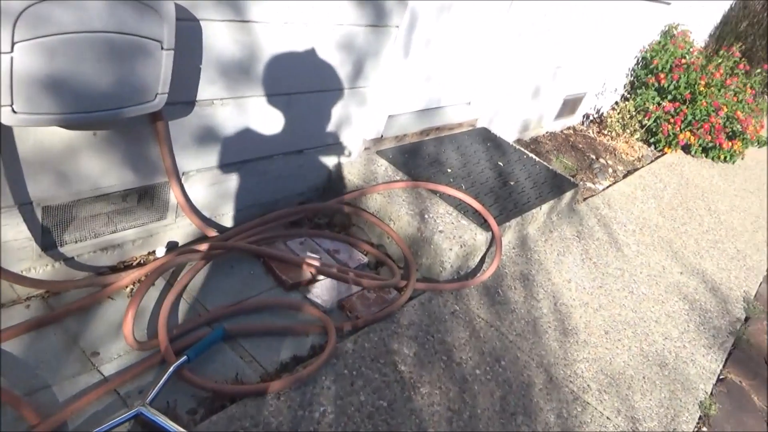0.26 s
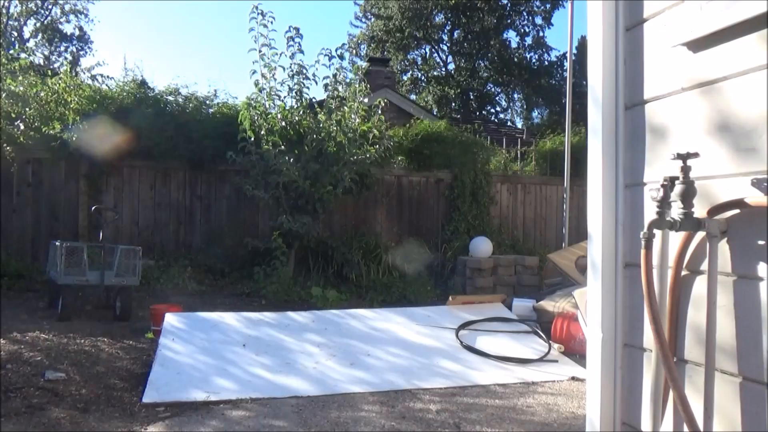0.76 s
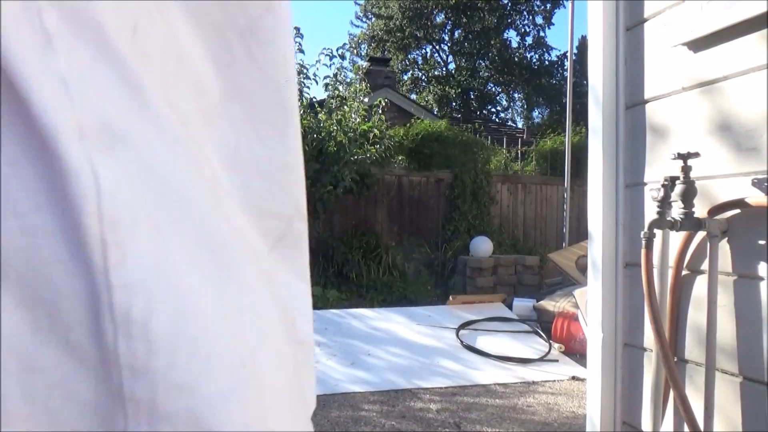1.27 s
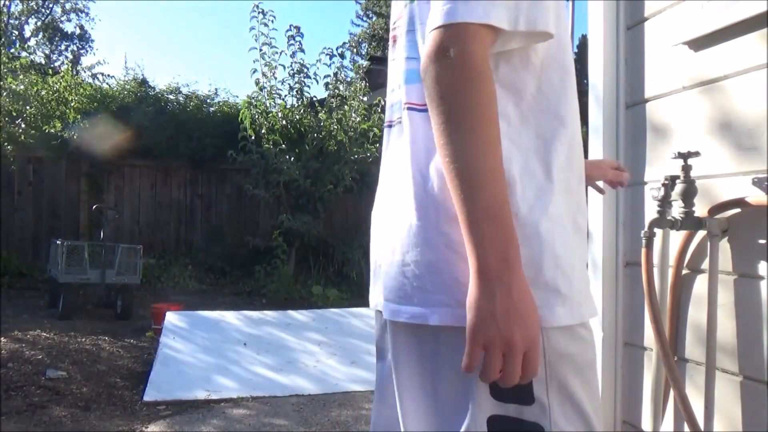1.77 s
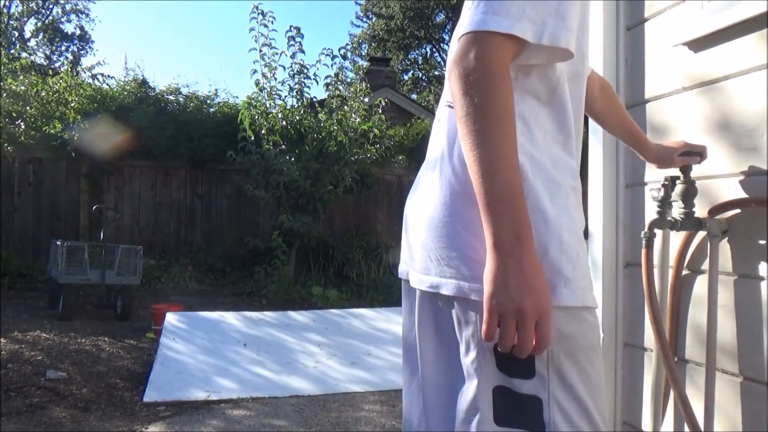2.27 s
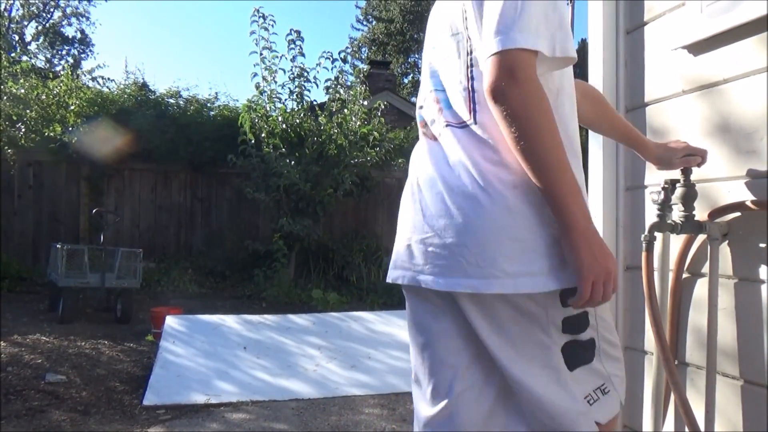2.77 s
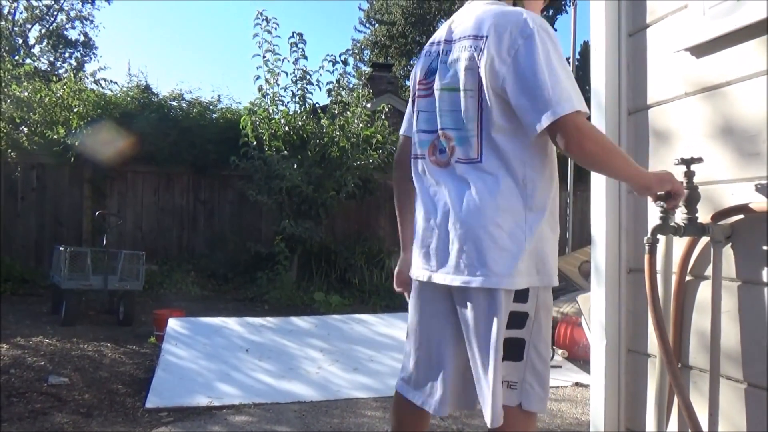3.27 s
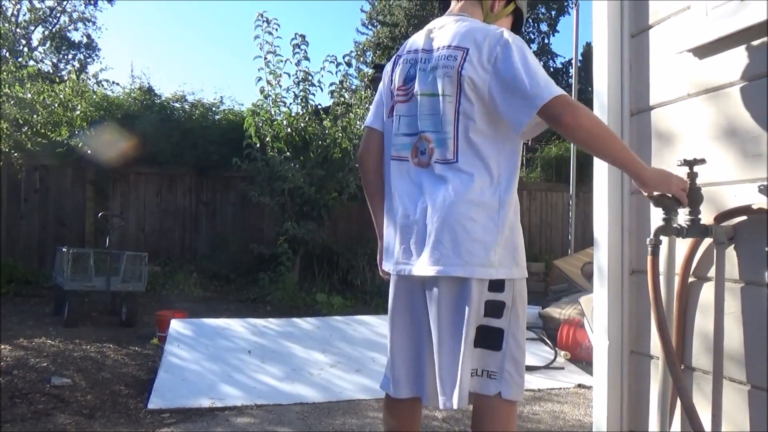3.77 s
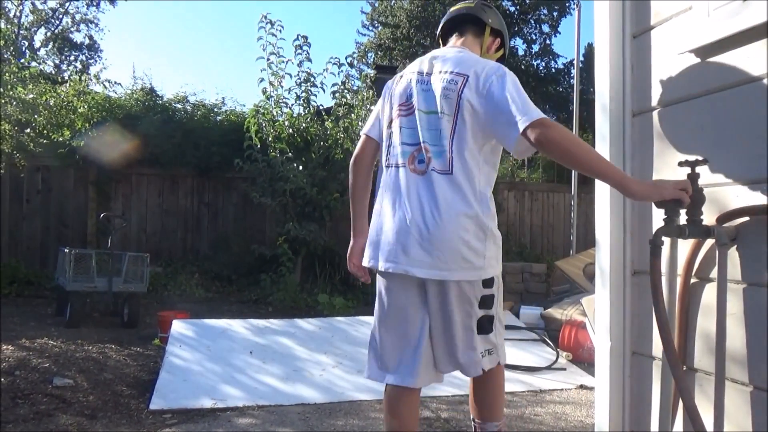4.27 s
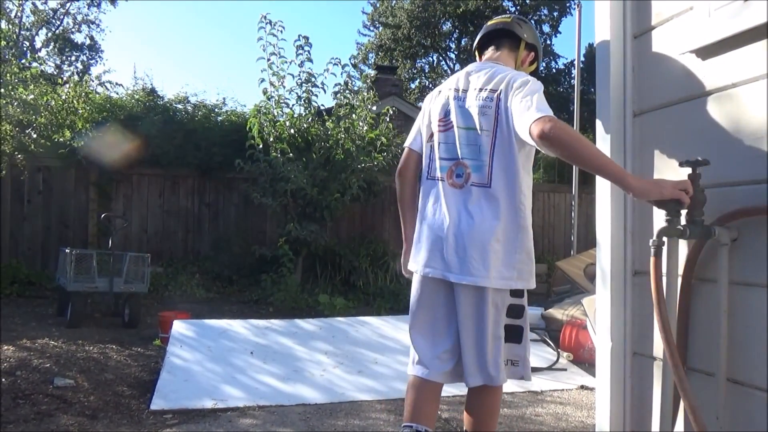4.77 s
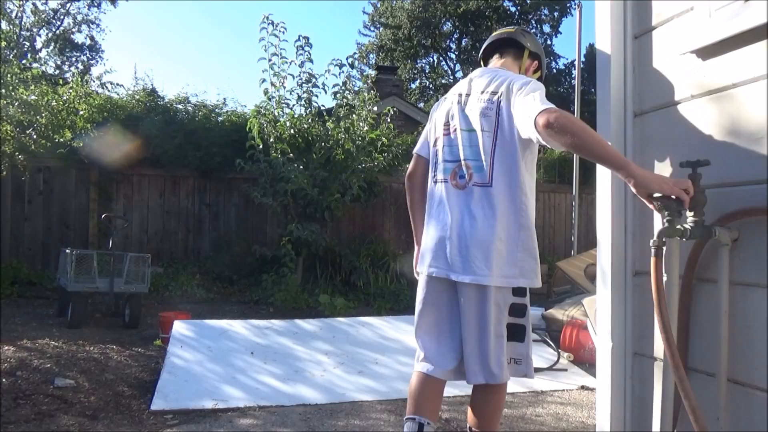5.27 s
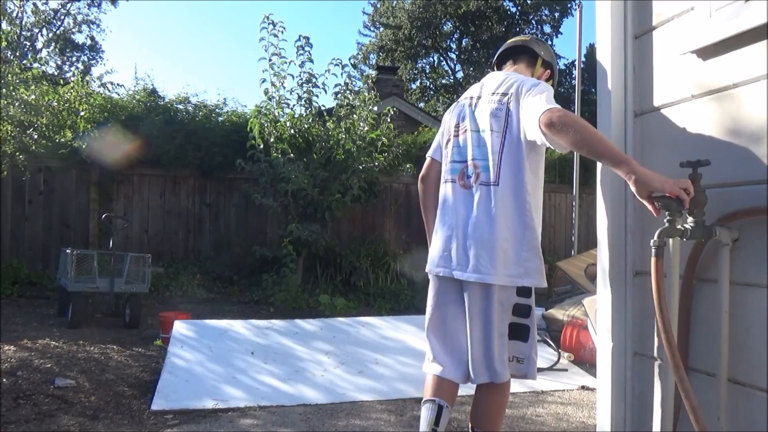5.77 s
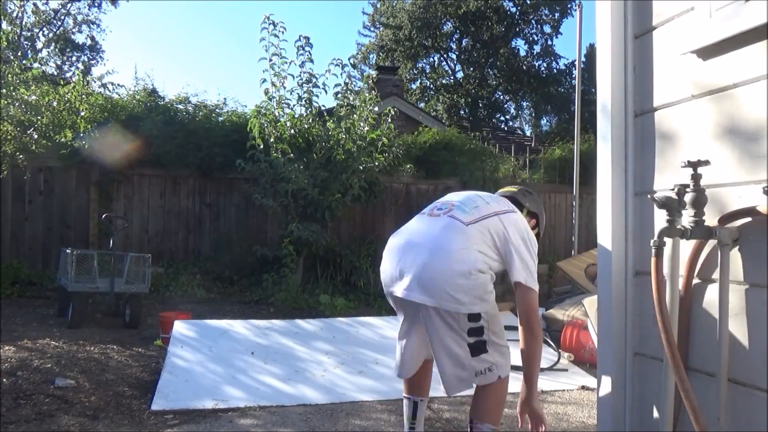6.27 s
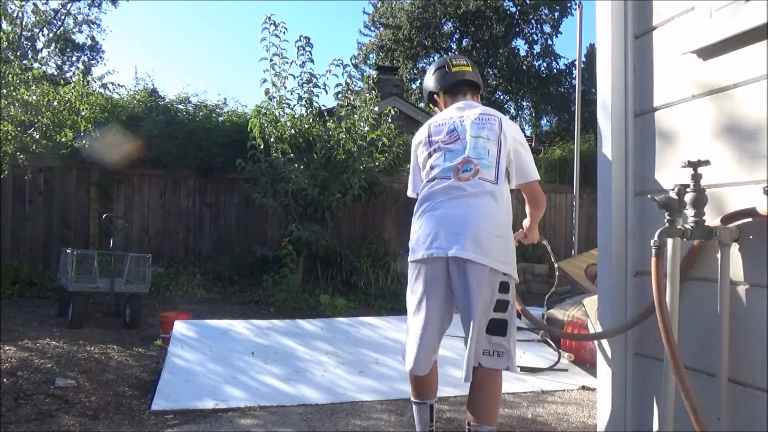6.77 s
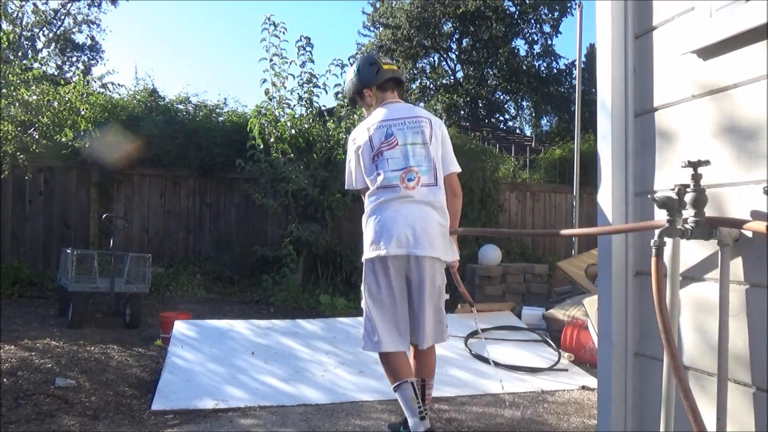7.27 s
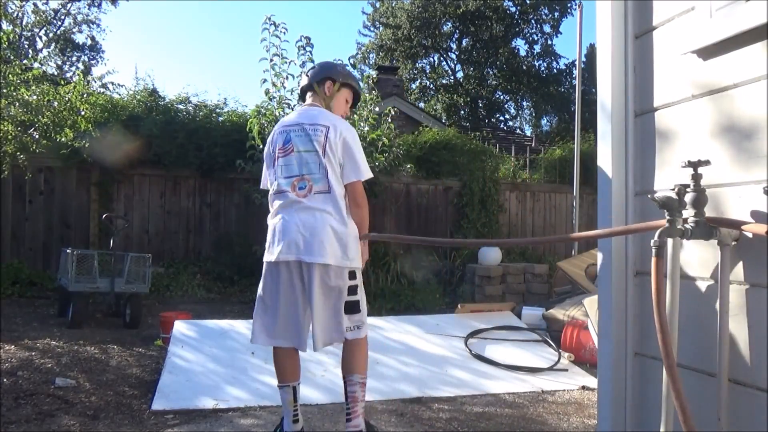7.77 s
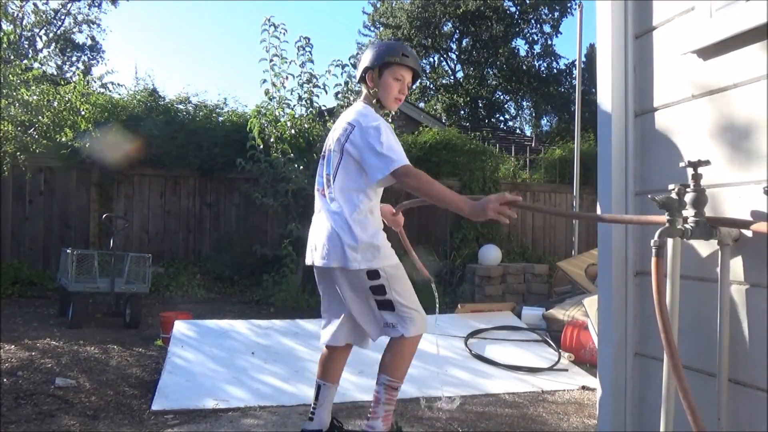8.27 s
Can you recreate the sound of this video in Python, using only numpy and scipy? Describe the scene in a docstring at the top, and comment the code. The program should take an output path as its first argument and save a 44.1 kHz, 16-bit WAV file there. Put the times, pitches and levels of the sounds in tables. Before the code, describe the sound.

Over a low outdoor rumble, someone knocks and turns a tap open; it spits, hisses steadily, and hose water slaps the ground.

```python
"""A back yard: over far traffic and a droning fan, a hand turns a brass garden tap open.
Handle and hose knock, the loose wheel rings and the valve stem squeaks. Turbulence at the valve seat
excites the resonances of tap and pipe, so the water hisses and spits; a house wall reflects the impacts.
All falls silent briefly near the start. Near the end, background and hiss drop in level
and slugs of water slap the paving."""
import sys
import numpy as np
from scipy import signal
from scipy.fft import rfft, irfft, next_fast_len
from scipy.io import wavfile
from scipy.ndimage import uniform_filter1d, map_coordinates

SR = 44100
rng = np.random.default_rng(int(sys.argv[2]) if len(sys.argv) > 2 else 0)


def bounce(signal):
    """Save signal as a 16-bit WAV file at the path given by the first command-line argument."""
    frames = np.transpose(np.atleast_2d(signal))
    limited = np.clip(frames, -1, 1)
    pcm = np.round(limited * 32767).astype(np.int16)
    wavfile.write(sys.argv[1], SR, pcm)


N = 375291
TIME = np.arange(N) / SR
TOP_HZ = 15760  # upper band limit


def amp(db):
    """Amplitude ratio of a level in decibels."""
    return 10 ** (np.asarray(db) / 20)


def unit(x):
    """Normalisation to an rms of 1."""
    return x / np.sqrt(np.mean(x ** 2) + 1e-20)


def along(points, hz):
    """Interpolation of (frequency [Hz], value) points on a logarithmic frequency axis."""
    f, values = np.transpose(points)
    return np.interp(np.log(hz + 1), np.log(f + 1), values)


def curves(rows):
    """Linear interpolation in time: one value per sample for each column after the first."""
    times, *columns = np.transpose(rows)
    return [np.interp(TIME, times, column) for column in columns]


def wobble(rate):
    """Smooth random modulation: a spline through `rate` Gaussian knots a second."""
    knots = rng.standard_normal(int(N * rate / SR) + 4)
    return map_coordinates(knots, [TIME * rate])


def late_drop(db, at_s=6.76, ramp_s=.024):
    """A step in level: a short ramp from 0 to `db`."""
    return db * np.clip((TIME - at_s) / ramp_s + .5, 0, 1)


def filtered(x, response):
    """Linear filtering: the spectrum of x times a frequency response."""
    size = next_fast_len(x.shape[-1] + 8192)
    return irfft(rfft(x, size) * response(np.fft.rfftfreq(size, 1 / SR)), size)[..., :x.shape[-1]]


def mode(f, hz, width):
    """Response of a damped resonator centred on `hz`, with half-power bandwidth `width` [Hz]."""
    return 1j * f * width / (hz * hz - f * f + 1j * f * width)


def rush(response, side_db, patchy_db, width=1, bins=6, frames=14):
    """Mid-side stereo noise whose level fluctuates in random patches of time and frequency."""
    spectra = signal.stft(rng.standard_normal((2, N)), nperseg=512)[2]
    patches = uniform_filter1d(rng.standard_normal(spectra.shape[1:]), size=bins, axis=0)
    patches = uniform_filter1d(patches, size=frames, axis=1)
    pair = signal.istft(spectra * amp(patchy_db * unit(patches)), nperseg=512)[1][:, :N]
    mid, side = filtered(pair, lambda hz: response(hz) * amp([0 * hz, along(side_db, hz)]))
    return np.array([mid + width * side, mid - width * side]) / np.std(mid)


def swells(events, bandwidth):
    """Amplitude-modulated noise bands that swell and fade; a fast level flicker makes them gritty."""
    out = np.zeros(N + SR)
    for start, length, hz, db in events:
        n = int(length * SR)
        band = filtered(rng.standard_normal(SR // 2), lambda f: mode(f, hz, bandwidth(hz)) ** 2)
        out[round(start * SR):][:n] += amp(db) * np.sqrt(np.hanning(n)) * unit(band)[:n]
    return out[:N] * amp(2.5 * wobble(120))


def impacts(events, bandwidth, t60_s, impulse, rise_s, order=2):
    """Impact excitation: an impulse and a decaying noise burst drive `order` resonators in series."""
    out, t = np.zeros(N + SR), np.arange(SR // 5) / SR
    for start, db, hz in events:
        burst = rng.standard_normal(len(t)) * amp(-60 * t / t60_s) * (1 - np.exp(-t / rise_s))
        burst[round(rise_s * SR)] += impulse
        hit = filtered(burst, lambda f: mode(f, hz, bandwidth(hz)) ** order * (f < TOP_HZ))
        out[round((start - rise_s) * SR):][:len(t)] += amp(db) * hit / np.abs(hit).max()
    return out[:N]


def yard():
    """Incoherent sources add: broadband noise of far traffic and leaves, narrow noise bands of a fan."""
    # background loudness (time [s], rumble level [dB], air level [dB])
    levels = [(0, -47.5, -47), (.25, -51, -42), (1.05, -43.5, -50.5), (1.55, -39.5, -45.5),
              (1.9, -39.5, -44), (2.1, -43.5, -45), (3.6, -42.5, -42.5), (3.8, -46, -39),
              (4.05, -37.5, -40), (4.4, -37, -38), (5.3, -38.5, -38.5), (6.73, -39.5, -40),
              (7.8, -37.5, -37), (8.2, -36, -35.5), (8.5, -37, -36)]
    # spectrum of the traffic rumble (frequency [Hz], gain [dB])
    rumble_spectrum = [(15, -53), (30, -15), (60, -8.5), (120, -7), (200, -5.5), (310, -4), (550, -15),
                       (900, -26.5), (1500, -65)]
    # spectrum of air in the leaves (frequency [Hz], gain [dB])
    air_spectrum = [(240, -35.5), (400, -5.5), (700, -5.5), (1850, -7), (4300, -16), (8000, -22.5),
                    (15600, -29.5)]
    # fan tones (frequency [Hz], resonator bandwidth [Hz], level relative to the rumble [dB])
    fan_tones = [(114.4, 38, -9), (142.3, 12, -12), (310.6, 14, -10.5), (366.4, 20, -7)]
    # stereo spread before narrowing (frequency [Hz], side relative to mid [dB])
    spread = [(60, -25), (400, -21.5), (1300, -5.5), (4400, -2), (8000, -5), (15000, -14.5)]
    # the image narrows once water runs (time [s], side gain [dB])
    narrowing = [(0, 4), (3.6, -2.5), (3.75, -15), (5.5, -23), (8.5, -83.5)]
    rumble_db, air_db = curves(levels)
    rumble_db += late_drop(-6.5)
    air_db += late_drop(-4.5)
    width = amp(curves(narrowing)[0])
    traffic = rush(lambda f: amp(along(rumble_spectrum, f)), spread, patchy_db=1.0, width=width)
    leaves = rush(lambda f: amp(along(air_spectrum, f)), spread, patchy_db=1.23, width=width)
    out = amp(rumble_db + 1.8 * wobble(9)) * traffic + amp(air_db) * leaves
    for hz, bandwidth, db in fan_tones:
        tone = unit(filtered(rng.standard_normal(N), lambda f: mode(f, hz, bandwidth) ** 2))
        out += amp(rumble_db + db + 3.2 * wobble(5)) * tone
    return out


def wall_echo(x, t60_s=.069, delay_samples=150):
    """Diffuse reflection from house wall and paving: convolution with exponentially decaying noise."""
    t = np.arange(SR // 6) / SR
    tail = rng.standard_normal((2, len(t))) * amp(-60 * t / t60_s)
    delayed = np.pad(x, (delay_samples, 0))[None]
    echo = signal.fftconvolve(delayed, tail / np.linalg.norm(tail[0]), axes=1)[:, :N]
    return echo + .5 * echo[::-1]  # each channel spills into the other


def bumps():
    """Soft bumps: brief swells of noise through a low resonance."""
    # low thuds (time [s], duration [s], level [dB])
    thuds = [(0, 0.36, -38.5), (1.19, .07, -37), (1.468, 0.056, -37), (1.75, .1, -37)]
    return swells([(start, length, 105, db) for start, length, db in thuds], lambda hz: 110)


def scuffs():
    """Sliding friction makes broad bands of gritty noise."""
    # rubbing contacts (time [s], duration [s], centre frequency [Hz], level [dB])
    rubs = [(0.041, 0.18, 4440, -42), (1.29, .17, 10000, -54), (1.41, .05, 8000, -50),
            (1.696, .06, 11000, -49), (1.949, 0.033, 13000, -31), (2.934, 0.055, 13000, -36),
            (2.941, 0.051, 2500, -43), (2.983, 0.038, 12000, -38), (2.99, .03, 2500, -39),
            (3.038, .06, 6900, -47), (3.276, 0.045, 3000, -49), (4.391, 0.084, 4500, -38),
            (7.018, 0.031, 4030, -32), (7.148, 0.037, 1500, -43), (7.49, 0.042, 1500, -40)]
    return swells(rubs, lambda hz: hz)


def knocks():
    """Impacts on heavily damped bodies give dull knocks with no clear pitch."""
    # handle and hose knocks, and steps (time [s], peak level [dB], centre frequency [Hz])
    blows = [(0.1341, -17, 1370), (0.1998, -34, 950), (1.297, -31, 570), (1.6881, -23.5, 525),
             (1.6992, -24, 547), (1.9507, -21.5, 500), (1.9554, -16, 1330), (1.958, -12, 720),
             (1.9847, -13, 1380), (2.8138, -29, 450), (2.9335, -21.5, 740), (2.9488, -21, 1110),
             (3.0851, -19.5, 754), (3.3062, -22.5, 1350), (3.613, -28, 410), (4.3548, -13.5, 1040),
             (4.44, -18.5, 480), (6.723, -23.5, 398), (7.1715, -23, 1220), (7.5009, -24, 695),
             (8.3355, -30, 800), (8.3451, -13.5, 503)]
    return impacts(blows, lambda hz: 1.5232 * hz, t60_s=.04, impulse=4.3, rise_s=.001974, order=3)


def hand_ticks():
    """Brief contacts have broad spectra and are heard as bright ticks."""
    # the hand on tap and handle (time [s], peak level [dB], centre frequency [Hz])
    touches = [(0.0514, -31, 2680), (.1343, -14, 3880), (1.3461, -31, 6750), (1.365, -19.5, 4940),
               (1.9556, -15.5, 2800), (1.9672, -10, 6000), (2.809, -26.5, 4160), (2.9431, -28, 3000),
               (2.9561, -15, 13900), (2.9977, -18, 13900), (3.0012, -11.5, 14400), (3.0879, -23.5, 5090),
               (3.2962, -28, 3560), (4.3555, -9, 3730), (4.4198, -16, 4840)]
    return impacts(touches, lambda hz: 1.36 * min(hz, 5000), t60_s=.014, impulse=2.26, rise_s=.00092)


def handle_ring():
    """Free vibration: the loose wheel rings in exponentially decaying modes when the hand lands on it."""
    # modes of the wheel (frequency [Hz], relative level [dB], time to decay by 60 dB [s])
    wheel_modes = [(2430, 8, 0.053), (9220, -13, 0.13), (9330, -12, 0.13), (9590, -15, .18),
                   (10140, -2, 0.061), (11000, -10, 0.1)]
    # strikes on the wheel (time [s], level [dB])
    strikes = [(1.9555, -28), (1.9675, -51), (1.9855, -30.5)]
    out, t = np.zeros(N + SR), np.arange(SR // 3) / SR
    for start, strike_db in strikes:
        for hz, mode_db, t60 in wheel_modes:
            envelope = amp(strike_db + mode_db + rng.normal(0, .67) - 60 * t / t60)
            out[round(start * SR):][:len(t)] += envelope * np.sin(2 * np.pi * hz * t)
    return out[:N]


def stem_squeaks():
    """Friction at the valve stem: noise through a narrow resonance takes on a thin pitch."""
    # faint squeaks (time [s], duration [s], centre frequency [Hz], level [dB])
    squeaks = [(2.49, .05, 4900, -61), (2.73, .12, 6300, -55), (2.82, .1, 5400, -53),
               (3.18, 0.11, 5030, -55), (3.21, 0.084, 5800, -55), (3.7, 0.24, 1710, -45.5),
               (3.761, 0.069, 4200, -43), (3.8, .12, 4700, -47), (4.435, 0.038, 5400, -36)]
    return swells(squeaks, lambda hz: 250)


def stem_leaks():
    """Air and spray escape at the stem in short bands of turbulent noise."""
    # escaping puffs (time [s], duration [s], centre frequency [Hz], level [dB])
    puffs = [(2.1, 0.28, 14900, -46.5), (3.267, 0.13, 14800, -53), (3.926, 0.071, 9800, -22.5),
             (4.397, 0.036, 4900, -31.5), (5.75, .05, 10500, -31.5)]
    return swells(puffs, lambda hz: 2300)


def spatter():
    """Small drops land as a Poisson process, each a damped click of a cycle or two at random pitch."""
    # density of the drops (time [s], rate [1/s])
    drop_rate = [(6.75, 0), (7.05, 450), (7.35, 0), (7.95, 0), (8.2, 200), (8.5, 100)]
    onsets = np.flatnonzero(rng.random(N) < curves(drop_rate)[0] / SR)
    pitch_draw, level_draw = rng.random((2, len(onsets), 1))
    offsets = np.arange(64)
    t = offsets / SR
    hz = 4500 * 3.1 ** pitch_draw
    clicks = amp(-29 - 3 * np.log(level_draw)) * np.sin(2 * np.pi * hz * t) * np.exp(-t * hz / 1.5)
    return np.bincount((onsets[:, None] + offsets).ravel(), clicks.ravel(), N + 64)[:N]


def splats():
    """Sudden deceleration: each slug of water radiates a sharp slap as the paving stops it."""
    # slugs landing (time [s], peak level [dB], centre frequency [Hz])
    slugs = [(6.7999, -13, 12010), (6.8161, -11, 8870), (6.8284, -21, 3900), (6.899, -8, 12360),
             (6.9267, -15, 6070), (6.9464, -11, 13520), (6.9546, -14, 6500), (6.966, -14, 5600),
             (6.9949, -17.5, 2760), (7.0148, -19, 3000), (7.0237, -4.5, 3600), (7.0385, -23, 4000),
             (7.08, -23, 3500), (7.0901, -11, 9500), (7.1015, -10, 13140), (7.1083, -20, 7000),
             (7.1605, -10, 5500), (7.172, -16, 2650), (7.1939, -7, 14190), (7.2096, -7.5, 7240),
             (7.239, -12, 6130), (7.2437, -14, 6500), (7.6037, -13, 14300), (8.082, -8.5, 12960),
             (8.156, -15, 6000), (8.2229, -2, 5450), (8.2546, -6.5, 13350), (8.264, -9, 9600),
             (8.3913, -15, 9600), (8.4429, -12, 3300), (8.487, -15.5, 2560)]
    return impacts(slugs, lambda hz: .7072 * hz, t60_s=.0093, impulse=3.4, rise_s=.0006)


def valve_spits():
    """The valve spits: short pressure pulses, each focused in one band by a resonance."""
    # spits (time [s], peak level [dB], centre frequency [Hz])
    spits = [(3.6031, -10.5, 9900), (3.623, -10.5, 9100), (4.4036, -9, 5120), (4.9104, -22.5, 7000),
             (5.3468, -22.5, 5500), (5.4327, -16.5, 6540), (5.5184, -14.5, 6700), (5.6077, -20, 7000)]
    return impacts(spits, lambda hz: 2040, t60_s=.018, impulse=2.26, rise_s=.00092)


def tap_hiss(opens_s=3.6, opening_s=.05):
    """Turbulence at the valve seat excites the brass; three bands swell as the opening changes."""
    # strength of the flow noise (time [s], jet level [dB], valve level [dB])
    flow = [(3.62, -50, -42), (3.78, -28.5, -36.5), (3.9, -26, -29), (4.0, -36.5, -34.5),
            (4.22, -31.5, -40), (4.4, -26, -33), (4.55, -32, -33), (4.75, -30.5, -36), (5.1, -24, -33.5),
            (5.22, -27, -35), (5.4, -23.5, -33), (5.7, -26.5, -32), (6.1, -23, -26.5), (6.5, -23.5, -26.5),
            (6.76, -22, -26.5), (7.8, -24, -28.5), (8.1, -21.5, -26), (8.5, -25, -30)]
    # broad spectrum of the hiss (frequency [Hz], gain [dB])
    hiss_spectrum = [(1800, -36), (3000, -18.5), (5200, -11.5), (8000, -11.5), (8600, -7.5), (12600, 2),
                     (14000, -1.5), (15800, -3)]
    # resonances and notches of tap and pipe (frequency [Hz], bandwidth [Hz], gain [dB])
    brass = [(3300, 200, -6), (3850, 200, 6), (4540, 400, 4), (5250, 200, -6), (6210, 220, 5),
             (6900, 150, -4), (7250, 250, 3), (8050, 250, -4), (8450, 400, 3), (9040, 250, 4),
             (9930, 350, 5), (10250, 120, -6), (10600, 300, 5), (10900, 150, -6), (11550, 200, 3),
             (11970, 180, 7), (12900, 250, -4), (13460, 200, 3), (14230, 100, 6), (14550, 150, 3)]
    # stereo spread of the hiss (frequency [Hz], side relative to mid [dB])
    spread = [(3000, -36), (8500, -14.5), (10000, -12.5), (15000, -8.5)]
    # the tap sits to the right (frequency [Hz], left minus right [dB])
    balance = [(4400, 0.5), (8500, -1), (10000, -2.5), (15000, -3)]

    def colour(f):
        resonances_db = sum(db * np.abs(mode(f, hz, width)) ** 2 for hz, width, db in brass)
        return amp(along(hiss_spectrum, f) + resonances_db)

    def above(f, edge_hz):
        return 1 / (1 + (edge_hz / (f + 1)) ** 16)

    jet_db, valve_db = curves(flow)
    pipe_db = np.minimum(jet_db - 9, -38.5)  # the pipe follows the jet until it runs full
    bands = [(jet_db, lambda f: above(f, 13150)),
             (valve_db, lambda f: above(f, 6480) - above(f, 12320)),
             (pipe_db, lambda f: 1 - above(f, 8050))]
    surge_db = .69 * wobble(25) + late_drop(-4)
    hiss = np.zeros((2, N))
    for db, passband in bands:
        turbulence = rush(lambda f: colour(f) * passband(f), spread, patchy_db=2.5, bins=3, frames=40)
        hiss += amp(db + surge_db) * turbulence
    opened = np.clip((TIME - opens_s) / opening_s, 0, 1)
    return filtered(hiss * opened, lambda f: amp(along(balance, f) * np.array([[.5], [-.5]])))


def scene():
    """Superposition of the background, the near sounds with their reflection, and the running water."""
    contacts = bumps() + scuffs() + knocks() + hand_ticks() + handle_ring() + stem_squeaks()
    near = contacts + stem_leaks() + splats() + valve_spits()
    direct = near * amp([[-.4], [.4]])  # slightly to the right
    return yard() + direct + amp(-9) * wall_echo(near) + spatter() + tap_hiss()


def record(dry):
    """Microphone self-noise adds to the sound; a gate makes one silent gap and a low-pass ends the band."""
    self_noise_db, silent_from_s, silent_until_s = -56.5, .28, 1.048
    mic = dry + amp(self_noise_db) * rng.standard_normal(N)
    fade_out = (silent_from_s - TIME) / .057
    fade_in = (TIME - silent_until_s) / .003
    gate = np.clip(np.maximum(fade_out, fade_in), 0, 1)
    return filtered(mic * gate, lambda hz: 1 / (1 + np.minimum(hz / TOP_HZ, 1.1) ** 700))


dry = scene()
out = record(dry)
bounce(out)
```